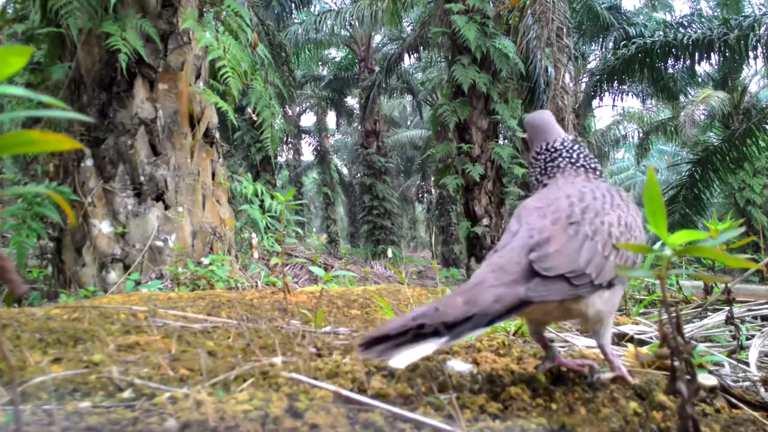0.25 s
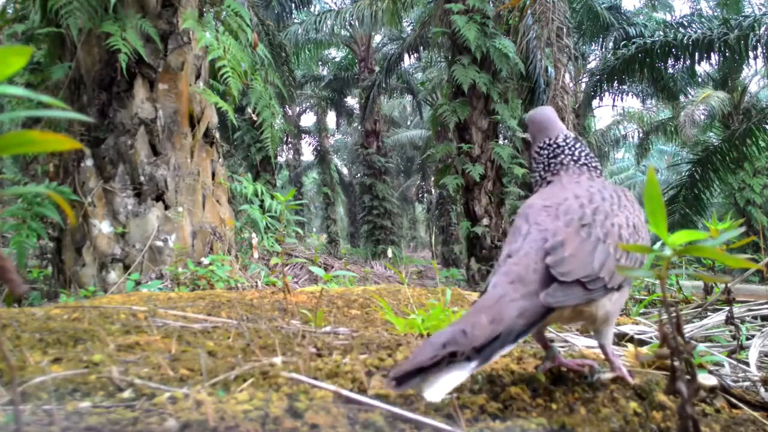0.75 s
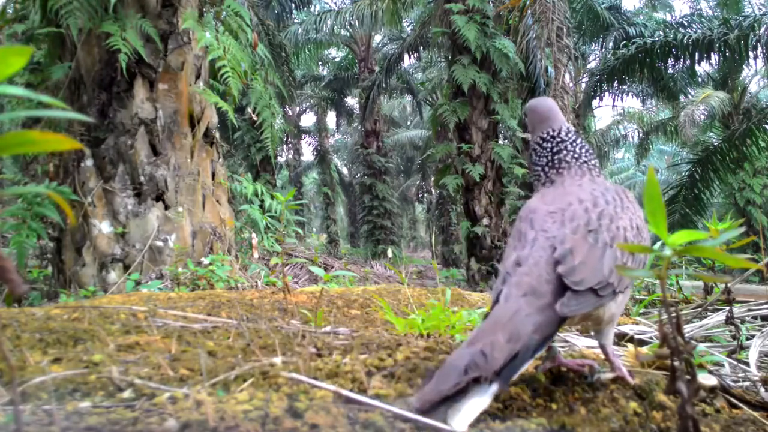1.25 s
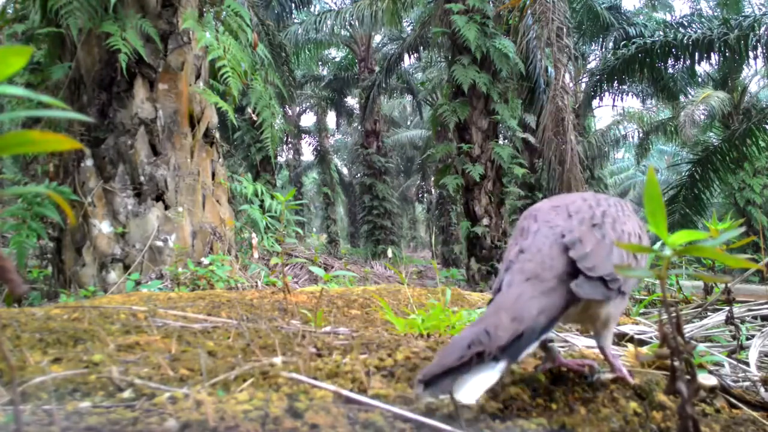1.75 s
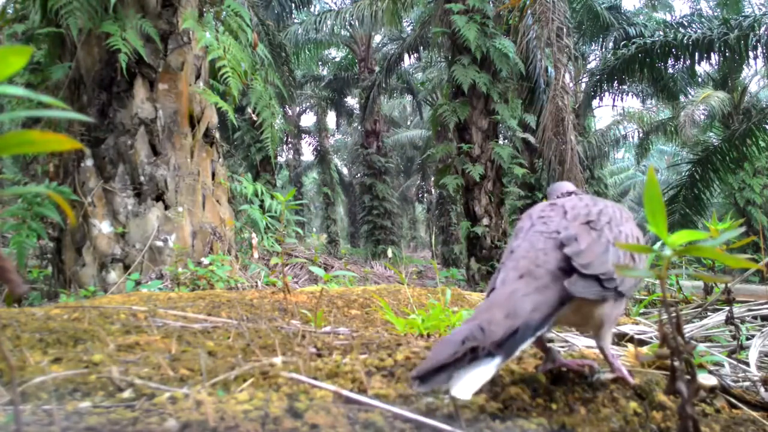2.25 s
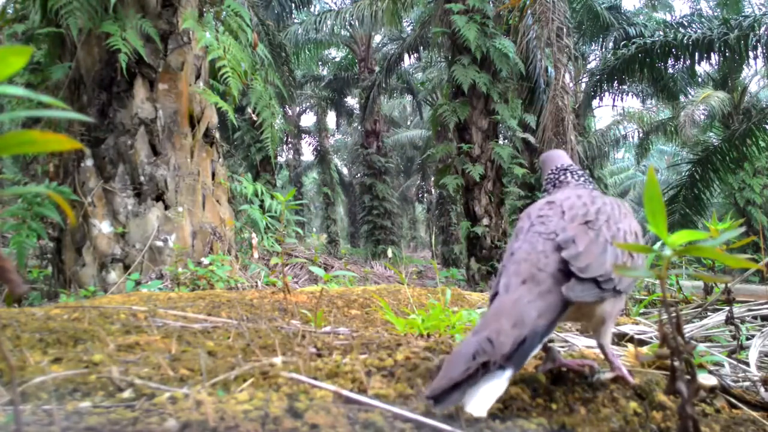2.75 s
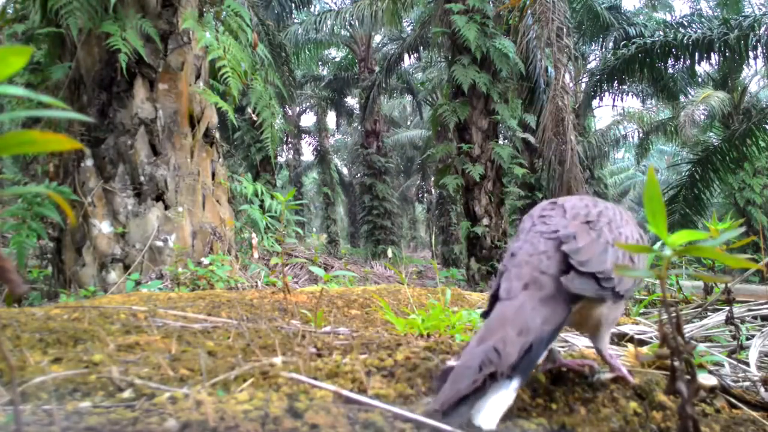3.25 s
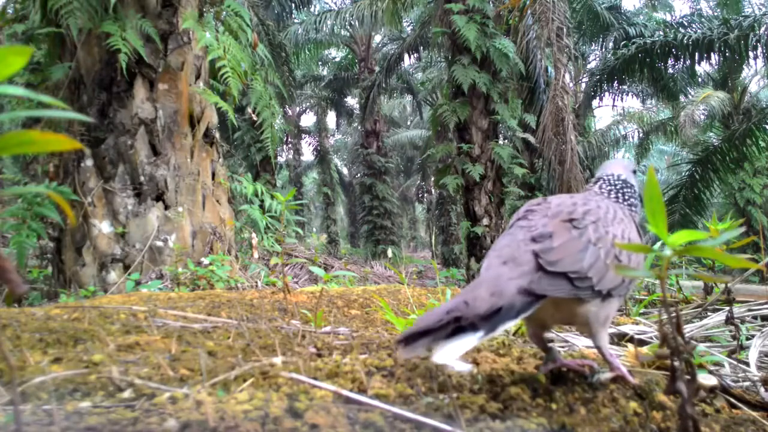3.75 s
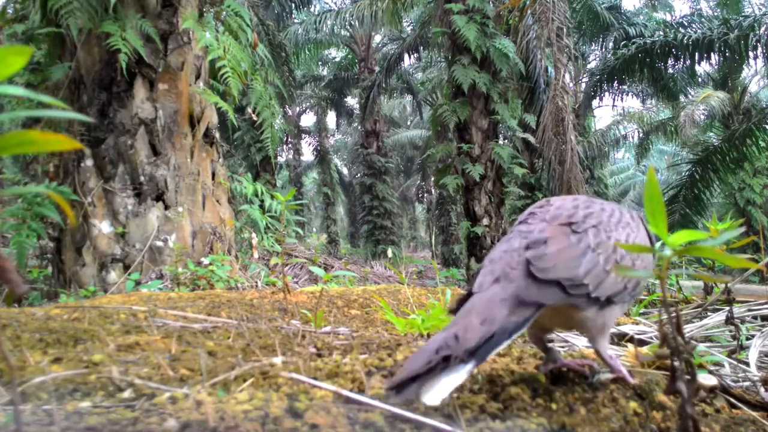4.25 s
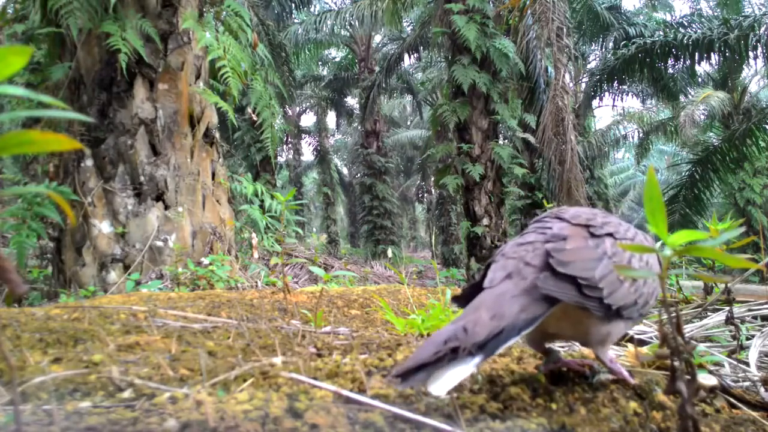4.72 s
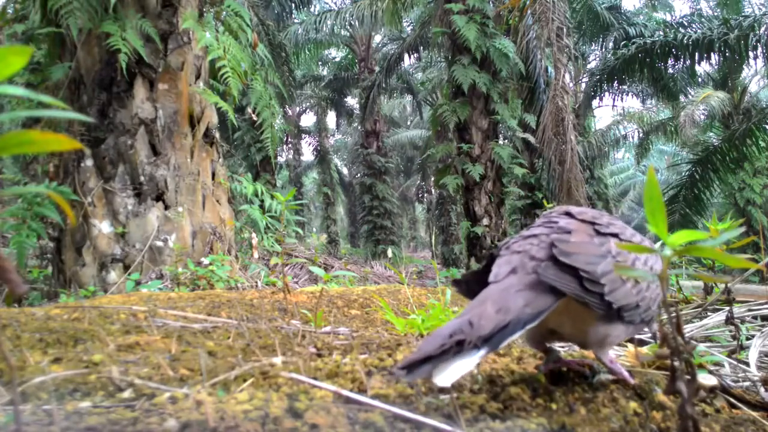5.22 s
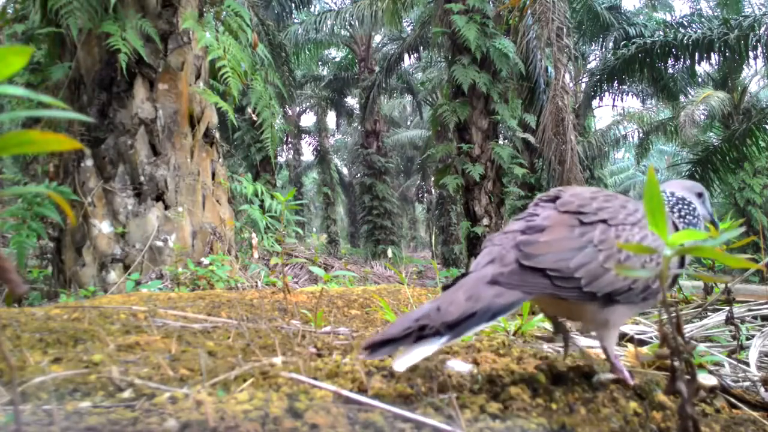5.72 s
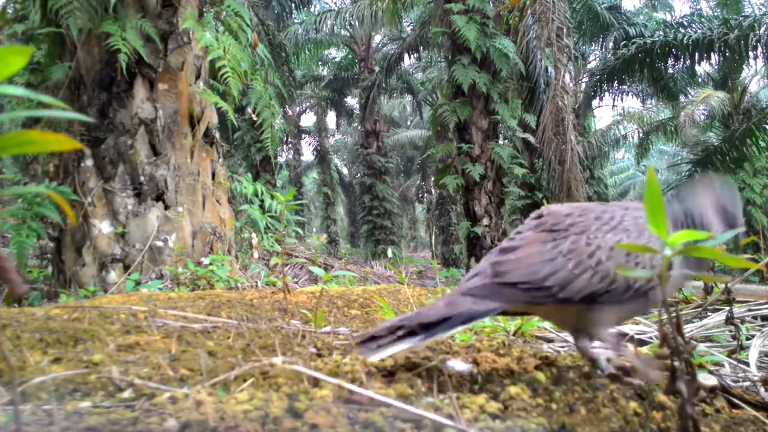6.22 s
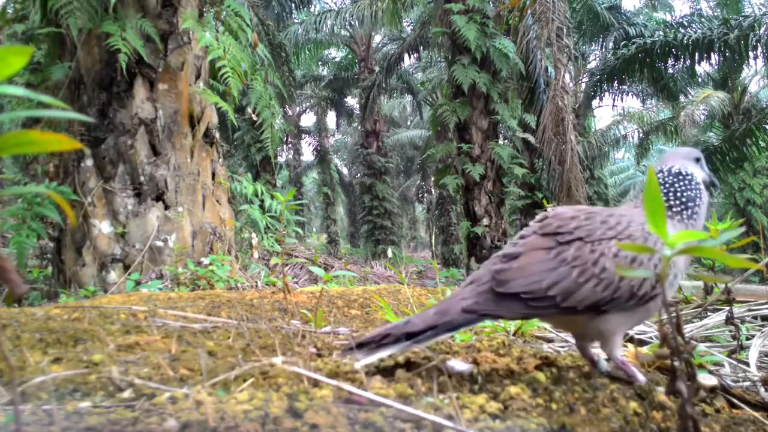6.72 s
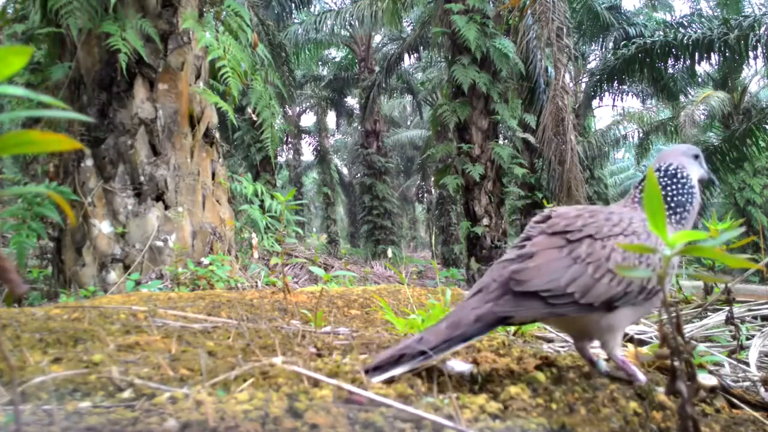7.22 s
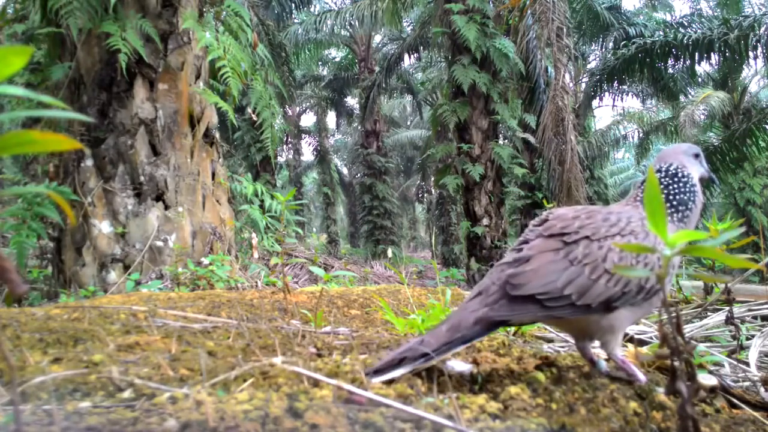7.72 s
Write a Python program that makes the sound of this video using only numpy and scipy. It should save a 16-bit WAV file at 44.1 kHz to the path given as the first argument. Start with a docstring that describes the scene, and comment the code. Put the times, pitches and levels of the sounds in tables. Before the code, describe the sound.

Outdoors among trees, soft doves coo with a fast throaty throb, one of them far off. A sharp double chip from a small bird rings early. After about three seconds a louder dove joins, repeating a short purr followed by a long rising and falling coo. Faint ticks and thin whistles continue, and a hoarse twitter of distant birds swells at the end. Insects and foliage hiss stay very quiet, with slight wind bumps at the microphone.

```python
"""Soft doves coo first in a palm grove, one of them far off; a louder one joins: short purrs, long arched notes.
Each coo is a nearly pure tone that the throat chops into fast throbs. Small birds chip, whistle, call hoarsely
and twitter, their gliding notes and rasps echoing among the trunks. Filtered noise makes the shrill insects,
the foliage, the low hum, a scuff and the wind at the microphone. A noise suppressor sinks quiet stretches."""
import sys
import numpy as np
from scipy import signal
from scipy.fft import rfft, irfft, next_fast_len
from scipy.io import wavfile
from scipy.ndimage import uniform_filter1d

SR = 44100
rng = np.random.default_rng(int(sys.argv[2]) if len(sys.argv) > 2 else 0)


def master_out(mix):
    """Clip the mix to full scale and print it as 16-bit PCM to the path in sys.argv[1]."""
    frames = np.transpose(np.atleast_2d(mix))
    ceiling = np.clip(frames, -1, 1)
    pcm = np.round(ceiling * 32767).astype(np.int16)
    wavfile.write(sys.argv[1], SR, pcm)


N = 351477  # length in samples
TIME = np.arange(N) / SR  # s

# All levels stand ahead of the echo and the recorder's suppressor.
# Distant foliage, spectrum of the hiss. Each row: frequency in Hz, relative density in dB per Hz.
AIR_COLOUR = [(500, -4), (1000, -1), (1700, -0.5), (2800, -0.5), (4000, -1.5), (5500, -0.5), (7000, 0),
              (8000, 1), (8500, -7), (10200, -6), (11000, -64)]
# Low outdoor hum. Each row: frequency in Hz, relative density in dB per Hz.
MURMUR_COLOUR = [(20, -16.5), (50, -1.5), (95, 1.5), (130, -1.5), (250, -4.5), (400, -5.5), (700, -11.5),
                 (1100, -15.5), (2000, -27)]
# Narrow band of the insects. Each row: frequency in Hz, relative density in dB per Hz.
INSECT_COLOUR = [(5000, -41), (5950, -20.5), (6250, -9.5), (6420, -7.5), (6530, -1.5), (6650, -20.5),
                 (6850, -19.5), (8000, -34.5)]
# Soft buffets of wind on the microphone. Each row: start in seconds, length in seconds, level in dB,
# upper edge in Hz.
WIND_BUFFETS = [(.08, 0.27, -67.5, 410), (1.1, 0.1, -79, 110), (1.19, 0.17, -64, 510),
                (1.235, 0.071, -61, 93), (1.49, 0.057, -71, 91), (1.585, 0.076, -53.5, 165),
                (1.67, .07, -57, 140), (1.82, 0.18, -74, 222), (2.33, 0.078, -76, 130),
                (2.48, 0.039, -58, 250), (3.42, 0.089, -64, 130), (4.65, 0.22, -71, 132),
                (6.2, 0.24, -74, 129), (6.89, 0.069, -69, 128)]
# One dry scuff. Each row: frequency in Hz, relative density in dB per Hz.
RUSTLE_COLOUR = [(20, -19), (400, -15), (1000, -14), (3000, -15.5), (5000, -15.5), (6500, -9.5),
                 (8500, -20), (10500, -25.5)]
# Echo among the trunks. Each row: frequency in Hz, time to die by 60 dB in seconds.
GROVE_DECAY = [(500, 0.96), (2000, 0.75), (4000, 0.52), (6500, 0.63), (10000, 0.44)]
# Far birds: low hoarse falling calls and the high twitter of a flock. Each row: start in seconds,
# length in seconds, first pitch in Hz, last pitch in Hz, level in dB before the trims in small_birds().
FAR_BIRDS = [ (6.06, 0.072, 2660, 2454, -67), (6.1, 0.049, 2113, 2010, -73),
             (6.36, 0.088, 2600, 2440, -69.5), (6.41, 0.051, 2070, 2063, -70),
             (6.92, 0.062, 4270, 5660, -62.5), (7.02, 0.062, 5320, 4430, -62.5),
             (7.1, 0.077, 3756, 3550, -64), (7.12, 0.032, 5230, 4650, -61.5),
             (7.18, 0.074, 3450, 3110, -65.5), (7.21, 0.05, 4420, 5070, -58.5),
             (7.23, 0.049, 6060, 6320, -59.5), (7.28, 0.041, 4270, 5290, -53.5),
             (7.275, 0.027, 5370, 5280, -57), (7.35, 0.067, 3120, 2772, -59),
             (7.36, 0.087, 3820, 4760, -60), (7.4, 0.036, 5500, 5160, -53.5),
             (7.44, 0.13, 6290, 5800, -59.5), (7.45, 0.072, 4120, 5240, -53), (7.5, .09, 4980, 4430, -54),
             (7.52, 0.057, 4060, 3940, -56.5), (7.59, 0.067, 4480, 3640, -54),
             (7.65, 0.073, 3010, 2595, -56.5), (7.68, 0.043, 6210, 6850, -61.5),
             (7.72, 0.084, 2880, 2880, -80), (7.75, 0.06, 2286, 2000, -67), (7.81, 0.13, 4820, 4480, -59),
             (7.85, 0.12, 4580, 4560, -56), (7.86, 0.15, 6000, 5500, -64.5), (7.9, 0.047, 4000, 3830, -58),
             ]
# Thin whistled notes of small birds. Each row: start in seconds, length in seconds, first pitch in Hz,
# last pitch in Hz, level in dB before the trims in small_birds().
THIN_WHISTLES = [ (.15, 0.082, 2750, 3760, -74.5), (1.81, 0.15, 2800, 2675, -84),
                 (2.17, 0.045, 2790, 2615, -79), (3.24, 0.059, 2900, 3620, -76),
                 (3.35, 0.045, 2790, 2760, -74), (3.75, 0.046, 2880, 2740, -80),
                 (4.26, 0.072, 2800, 3850, -77), (4.67, 0.067, 2900, 3580, -80),
                 (5.04, 0.064, 2700, 3650, -76.5), (5.34, 0.053, 2790, 2736, -79.5),
                 (5.42, 0.056, 2800, 3370, -84), (6.78, 0.085, 2800, 3930, -83), ]
# One bird's sharp falling tick. Each row: start in seconds, level in dB before the trims in small_birds().
FALLING_TICKS = [(0.189, -66), (1.336, -75), (1.705, -67), (2.095, -88), (3.275, -64), (3.674, -65.5),
                 (4.075, -74), (4.472, -66), (4.849, -69.5), (5.255, -70.5), (5.63, -73.5), (6.014, -68),
                 (6.396, -74)]
# Soft near peeps. Each row: start in seconds, length in seconds, first pitch in Hz, last pitch in Hz,
# level in dB before the trims in small_birds().
NEAR_PEEPS = [(1.594, 0.017, 1870, 1760, -70), (1.688, 0.023, 1880, 1700, -65.5),
              (1.777, .02, 1790, 1710, -72)]
# A near bird's harsh double chip. Each row: start in seconds, length in seconds, level in dB
# before soft clipping.
DOUBLE_CHIP = [(0.651, 0.015, -40), (0.663, 0.024, -33.5)]
# Spectrum of its rasp before soft clipping. Each row: frequency in Hz, relative density in dB per Hz.
CHIP_RASP_COLOUR = [(1800, -50), (2600, -24.5), (3550, -17), (3900, -3.5), (4400, -7.5), (4900, -5),
                    (5300, -4.5), (5700, 2), (6500, 1.5), (7100, -0.5), (7600, -14), (8100, -16),
                    (8500, -41), (10500, -33)]
# Softer doves, one list a coo; the one at 1.29 s is a far dove, the one at 2.43 s an echoing tail.
# Each row: time in seconds, level in dB before the throat, central pitch in Hz,
# throb rate per second before jitter, roughness (no unit, later held to 0.1-1).
SOFT_COOS = [
    [(-.02, -47.5, 708, 53.1, 1), (.09, -46.5, 655, 55.6, 0.46), (.184, -44.5, 619, 56.2, 0.21),
     (.242, -49.5, 595, 54.3, 0.3), (.3, -61.5, 530, 53, 0.24)],
    [(.663, -61.5, 570, 92, 0.32), (.704, -49, 619, 88.3, 0.42), (.812, -48, 609, 94.7, 0.45),
     (.835, -58, 560, 92, 0.52)],
    [(.943, -60, 590, 58.4, 0.17), (.989, -52.5, 629, 58.6, 0.46), (1.021, -56, 641, 58.8, 0.64),
     (1.081, -52.5, 647, 65, 0.58), (1.163, -45, 634, 65.9, 0.52), (1.269, -46, 605, 63.3, 0.35),
     (1.32, -67, 560, 63.6, 0.47)],
    [(1.29, -57.5, 665, 57.4, 1), (1.42, -58.5, 659, 57.1, 0.33), (1.54, -56.5, 630, 59.4, 0.27),
     (1.62, -54.5, 627, 67.4, 0.68), (1.676, -70, 620, 69.4, 0.56), (1.74, -64, 595, 69, 0.25)],
    [(1.77, -67, 570, 87.5, 0.55), (1.813, -50.5, 611, 91, 0.39), (1.925, -48, 600, 88, 0.38),
     (1.96, -67, 545, 92, 0.41)],
    [(2.052, -67, 565, 59.6, 0.23), (2.08, -52.5, 616, 58.7, 0.65), (2.15, -54.5, 635, 58, 0.32),
     (2.205, -44, 643, 60.4, 0.66), (2.305, -46.5, 626, 64, 0.52), (2.429, -50.5, 585, 62, 0.17),
     (2.448, -64.5, 560, 62, 0.4)],
    [(2.43, -62, 640, 69, 0.88), (2.49, -59.5, 620, 67.6, 0.43), (2.55, -81, 600, 69, 0.69)],
    [(2.785, -86, 610, 92, 0.49), (2.85, -69, 620, 91, 0.32), (2.96, -67, 600, 94, 0.61)],
    [(3.08, -53.5, 610, 57.3, 0.5), (3.15, -50.5, 645, 55.4, 1), (3.235, -43, 640, 59.4, 0.25),
     (3.31, -54.5, 625, 58.6, 0.26), (3.42, -67, 580, 60, 0.23)],
    [(3.836, -53, 580, 88, 0.78), (3.858, -46, 605, 87.5, 0.92), (3.92, -52, 608, 89, 0.51),
     (3.984, -46, 600, 89, 0.45), (4.01, -60.5, 560, 88, 0.37)],
    [(4.115, -60, 570, 60.2, 0.17), (4.15, -53.5, 605, 66.4, 0.64), (4.25, -47, 630, 66.1, 0.33),
     (4.36, -54.5, 630, 61.7, 0.36), (4.45, -46, 595, 63.5, 1), (4.485, -66.5, 565, 63.7, 0.31)],
    [(5.13, -60, 570, 56, 0.41), (5.159, -47, 595, 57.2, 0.3), (5.269, -47, 647, 61.3, 0.58),
     (5.361, -46, 615, 71, 0.44), (5.465, -53.5, 590, 76.8, 0.53), (5.505, -66, 560, 72.6, 0.46)],
    [(6.26, -50.5, 660, 59, 0.8), (6.35, -46, 650, 59, 0.39), (6.42, -46.5, 615, 60.6, 0.24),
     (6.48, -47, 600, 60, 0.37), (6.525, -54, 595, 60, 1), (6.548, -65, 560, 60, 0.81)],
    [(6.98, -51.5, 600, 89.3, 1), (7.04, -50, 600, 88, 0.54), (7.1, -51.5, 595, 89.5, 0.35),
     (7.17, -53, 590, 91, 0.6)],
    [(7.53, -46, 670, 55.3, 0.52), (7.65, -42.5, 650, 56.3, 0.6), (7.736, -49, 605, 59.1, 0.63),
     (7.808, -48, 574, 54, 0.1), (7.864, -53, 545, 53, 0.29), (7.91, -47.5, 495, 54, 0.18),
     (7.98, -57.5, 475, 52.4, 0.23)],
]
# The louder dove, one list a coo. Each row: time in seconds, level in dB before the throat,
# central pitch in Hz, throb rate per second before jitter, roughness (no unit, later held to 0.1-1).
LOUD_COOS = [
    [(2.965, -65.5, 490, 92, 0), (2.992, -55.5, 534, 81, 0.4), (3.01, -56.5, 534, 88.2, 0.46),
     (3.08, -51, 520, 85.3, 0.45), (3.135, -45.5, 530, 92, 0.67), (3.172, -58, 480, 91, 0.2)],
    [(3.265, -54.5, 530, 51.4, 1.2), (3.305, -40.5, 589, 52.9, 1.2), (3.4, -40.5, 623, 51.7, 1.3),
     (3.5, -36.5, 614, 46, 0.99), (3.6, -34.5, 596, 45.4, 0.6), (3.74, -40.5, 541, 51, 0.42),
     (3.82, -49, 480, 48, 0.26), (3.84, -67, 450, 44.8, 0.3)],
    [(4.25, -53.5, 540, 85.3, 1.1), (4.29, -40.5, 575, 89, 0.5), (4.35, -44.5, 570, 91.8, 0.84),
     (4.38, -41, 570, 88, 0.5), (4.435, -49, 490, 103.5, 0.76), (4.46, -54, 430, 88, 0.6)],
    [(4.56, -57, 510, 62.4, 1), (4.605, -43.5, 585, 60.6, 1.23), (4.69, -38, 630, 65.8, 0.64),
     (4.77, -38, 625, 65, 1.04), (4.84, -34.5, 607, 66.6, 0.24), (4.935, -35.5, 587, 65.5, 0.65),
     (5.06, -43.5, 526, 62, 0.29), (5.1, -50, 485, 60.6, 0.3), (5.128, -63.5, 455, 61.56, 0.1)],
    [(5.532, -64.5, 530, 95.04, 0.14), (5.553, -48, 552, 76.2, 0.74), (5.64, -46.5, 550, 88.8, 0.72),
     (5.683, -43, 554, 92, 0.7), (5.713, -46, 520, 104, 1), (5.735, -67, 450, 89.81, 0.6)],
    [(5.822, -58.5, 470, 63.5, 0.5), (5.884, -42.5, 590, 67.64, 1.2), (5.966, -38, 614, 65.1, 0.55),
     (6.084, -34, 615, 66.1, 0.6), (6.15, -35.5, 594, 65.3, 0.66), (6.236, -36.5, 578, 65, 0.27),
     (6.33, -43.5, 530, 59.6, 0.48), (6.385, -50.5, 475, 68.4, 0.48), (6.415, -62, 440, 69.12, 0.4)],
    [(6.834, -55, 525, 79.63, 0.4), (6.852, -46, 544, 80, 0.7), (6.92, -43.5, 550, 91.6, 0.68),
     (6.996, -43, 547, 90.3, 0.6), (7.03, -54, 480, 101, 0.8)],
    [(7.13, -53, 500, 48.6, 0.8), (7.17, -42, 546, 54.4, 0.92), (7.22, -38.5, 604, 48.7, 0.92),
     (7.32, -35.5, 605, 46.5, 0.99), (7.44, -31.5, 597, 61.7, 0.27), (7.53, -36, 560, 56.5, 0.36),
     (7.61, -42, 510, 57.5, 0.24), (7.64, -52, 475, 57.3, 0.4), (7.658, -60.5, 420, 61, 0.7)],
]
# Throat resonance of the softer doves. Each row: frequency in Hz, gain in dB.
SOFT_THROAT_GAIN = [(400, -27), (500, -13.5), (545, 1.5), (590, 0.5), (700, -1), (780, -1.5), (860, -7.5),
                    (1300, 4.5)]
# Throat resonance of the louder dove. Each row: frequency in Hz, gain in dB.
LOUD_THROAT_GAIN = [(250, -23.5), (380, 0), (470, 5), (620, -0.5), (760, 5.5), (820, 5), (900, 3.5),
                    (1300, -5.5)]


def gain_of(db):
    """Turns dB into an amplitude factor."""
    return 10 ** (np.asarray(db) / 20)


def evened(x):
    """Scales to rms 1."""
    return x / np.sqrt(np.mean(x ** 2) + 1e-20)


def read(points, hz):
    """Reads a spectrum on a log-frequency axis."""
    f, value = np.transpose(points)
    return np.interp(np.log(hz + 1), np.log(f + 1), value)


def add(mix, s, sound):
    """Mixes a sound in at time s, dropping what falls outside the mix."""
    start = round(s * SR)
    sound = sound[max(-start, 0):]
    part = mix[max(start, 0):][:len(sound)]
    part += sound[:len(part)]


def coloured(x, colour):
    """Filters x by a spectrum."""
    size = next_fast_len(N + 4096)
    gain = gain_of(read(colour, np.fft.rfftfreq(size, 1 / SR)))
    return irfft(rfft(x, size) * gain, size)[:N]


def noise(colour):
    """Noise of rms 1 with the given spectrum."""
    return evened(coloured(rng.standard_normal(N), colour))


def lowpassed(x, edge_hz):
    """Third-order low-pass."""
    return signal.sosfilt(signal.butter(3, edge_hz, fs=SR, output="sos"), x)


def drift(t, per_s):
    """A random wander along t that takes a new course per_s times a second."""
    knots = rng.standard_normal(2048)
    return np.interp((t - t[0]) * per_s, np.arange(len(knots)), knots)


def burst(s, length, taper):
    """A tapered gate over the whole time line."""
    gate = np.zeros(N)
    add(gate, s, signal.windows.tukey(max(round(length * SR), 8), min(taper, 1)))
    return gate


def grove(x, delay=0.0041):
    """Trunks and fronds scatter a sound: sparse echoes, each band dying at its own speed."""
    echo_chance = 2500 / SR  # 2500 echoes a second on average
    taps = rng.standard_normal(SR) * (rng.random(SR) < echo_chance)
    taps *= np.arange(SR) > delay * SR  # no echo before the delay in seconds
    hz, t, z = signal.stft(taps, SR, nperseg=256)
    decay = gain_of(-60 * t / read(GROVE_DECAY, hz)[:, None])
    tail = signal.istft(z * decay, SR, nperseg=256)[1]
    return signal.fftconvolve(x, tail / np.linalg.norm(tail))[:N]


def background(air_db=-70.5, murmur_db=-69, insects_db=-65.5, flutter_db=1.0, insect_swell_db=1.0):
    """Steady foliage hiss and low hum under the insects' narrow, wavering shrill."""
    swell = insect_swell_db * drift(TIME, 5.2)
    flutter = flutter_db * drift(TIME, 70)
    insects = gain_of(insects_db + swell + flutter) * noise(INSECT_COLOUR)
    return gain_of(air_db) * noise(AIR_COLOUR) + gain_of(murmur_db) * noise(MURMUR_COLOUR) + insects


def wind():
    """Dull buffets at the microphone: swells of low-passed noise."""
    out = np.zeros(N)
    for s, length, db, edge_hz in WIND_BUFFETS:
        # the end of a longer noise, where the filter has settled
        puff = lowpassed(rng.standard_normal(SR // 2), edge_hz)[-round(length * SR):]
        add(out, s, gain_of(db) * evened(puff * signal.windows.hann(len(puff))))
    return out


def rustle(level_db=-54):
    """One brief, dry scuff: a short gate of coloured noise."""
    return gain_of(level_db) * noise(RUSTLE_COLOUR) * burst(2.491, 0.035, 0.07)


def notes(table, waver, waver_per_s):
    """Gliding notes that swell and fade; a fast waver of pitch makes them hoarse."""
    out = np.zeros(N)
    for s, length, first_hz, last_hz, db in table:
        t = np.arange(0, length, 1 / SR)
        hz = np.linspace(first_hz, last_hz, len(t)) * (1 + waver * drift(t, waver_per_s))
        tone = np.sin(2 * np.pi * np.cumsum(hz) / SR)
        add(out, s, gain_of(db) * evened(tone * signal.windows.tukey(len(t), .85)))
    return out


def small_birds():
    """Near peeps, a repeated tick, thin whistles, and far calls and twitter that arrive mostly as echo."""
    peeps = notes(NEAR_PEEPS, waver=0.012, waver_per_s=340)
    # each tick lasts 0.037 s and falls from 6870 to 3105 Hz
    tick_rows = [(s, 0.037, 6870, 3105, db) for s, db in FALLING_TICKS]
    ticks = notes(tick_rows, waver=0.042, waver_per_s=1100)
    whistles = notes(THIN_WHISTLES, waver=0.025, waver_per_s=530)
    far_birds = notes(FAR_BIRDS, waver=0.0521, waver_per_s=800)
    # the harshest part of each note spreads far around its pitch
    far_birds += gain_of(-3.5) * notes(FAR_BIRDS, waver=0.147, waver_per_s=1200)
    direct = gain_of(3.0) * peeps + gain_of(-4) * ticks
    direct += gain_of(0.5) * whistles + gain_of(-6.5) * far_birds
    to_grove = gain_of(-6) * peeps + gain_of(-1.5) * ticks
    to_grove += gain_of(2) * whistles + gain_of(-1) * far_birds
    return direct + grove(to_grove)


def chip(echo_db=0.0):
    """A near bird's double chip, softly clipped noise of jumping level, rings on among the trunks."""
    gate = sum(gain_of(db) * burst(s, length, 0.46) for s, length, db in DOUBLE_CHIP)
    rasp = evened(noise(CHIP_RASP_COLOUR) * gain_of(2 * drift(TIME, 900)))
    call = gate * 1.8 * np.tanh(rasp / 1.8)
    return call + gain_of(echo_db) * grove(call)


def coo(rows, jitter, slip, bend, rebound, uneven_db, sharpness=2.58, overtone_db=-52,
        rasp_db=-33, rasp_width_hz=330, rounding_hz=185):
    """A pure tone chopped into uneven throbs that restart out of step; rough ones are narrow and rebound once."""
    s, *columns = np.transpose(rows)
    t = np.arange(s[0], s[-1], 1 / SR)
    level_db, hz, rate, rough = (np.interp(t, s, c) for c in columns)
    rough = np.clip(rough, .1, 1)
    chance = rng.uniform(-1, 1, (128, 5)) * np.sqrt(3)  # one row a throb, each column of rms 1

    # each throb lasts its own while; the fast purr of a short note is more even
    lengths = 1 + jitter * min(60 / rate.mean(), 1) ** 2 * chance[:, 4]
    throbs = np.interp(np.cumsum(rate) / SR, np.cumsum(lengths) - lengths[0], np.arange(len(lengths)))
    size, step, back_size, back_step, _ = chance[throbs.astype(int)].T
    opening = np.sin(np.pi * throbs) ** 2
    depth = np.clip(2.8 * rough, 0, 1)
    shape = opening ** (.2 + sharpness * rough ** 3)

    # pressure lifts the pitch at the crest of each throb, so sidebands lie mostly above the tone
    phase = slip * np.sqrt(rough) * step - bend * np.sin(2 * np.pi * throbs)
    hz = hz - 0.259 * bend * rate  # lowered to offset that lift
    main = shape * gain_of(uneven_db * size) * np.exp(1j * phase)
    after = rebound * np.sqrt(rough) * (1 - opening) ** 2
    after = after * (1 + .5 * back_size) * np.exp(2j * back_step)

    # the inflated throat rounds off every throb
    rounding = signal.butter(3, rounding_hz, fs=SR, output="sos")
    throb = signal.sosfiltfilt(rounding, 1 - depth + depth * (main + after))
    throb /= np.sqrt(uniform_filter1d(abs(throb) ** 2, size=2200) + 1e-9)  # even level over 50 ms

    # turbulence spreads a faint skirt around the tone
    rasp = lowpassed(rng.standard_normal((2, len(t))), rasp_width_hz)
    throb *= 1 + gain_of(rasp_db) * rough * (evened(rasp[0]) + 1j * evened(rasp[1]))
    tone = throb * np.exp(2j * np.pi * np.cumsum(hz) / SR)
    voice = np.sqrt(2) * (tone + gain_of(overtone_db) * tone ** 2).real
    fade = np.clip(np.minimum(t - t[0], t[-1] - t) / 0.0034, 0, 1)  # 3.4 ms at each end
    return s[0], voice * gain_of(level_db) * fade


def doves(loud_echo_db=-21, soft_echo_db=-18):
    """The loud dove and the softer ones through their throat resonances, with the grove's faint answer."""
    loud, soft = np.zeros(N), np.zeros(N)
    for rows in LOUD_COOS:
        add(loud, *coo(rows, jitter=.24, slip=1.25, bend=.4, rebound=.48, uneven_db=1.8))
    for rows in SOFT_COOS:
        add(soft, *coo(rows, jitter=.2, slip=.8, bend=.7, rebound=.45, uneven_db=1.6))
    loud, soft = coloured(loud, LOUD_THROAT_GAIN), coloured(soft, SOFT_THROAT_GAIN)
    return loud + soft + grove(gain_of(loud_echo_db) * loud + gain_of(soft_echo_db) * soft)


def scene():
    """Everything in the grove, heard at one point."""
    return (background() + wind() + rustle() + small_birds() + chip() + doves())[None]


def suppressor(x, threshold_db=-50, slope=0.87, glide_db_per_s=55, shrill_extra=0.36):
    """Turns quiet stretches down, gliding shut after a sound and open ahead of the next."""
    level_db = 10 * np.log10(abs(uniform_filter1d(x ** 2, size=1300)) + 1e-12)
    wanted_db = slope * np.minimum(level_db - threshold_db, 0)
    ramp = glide_db_per_s * TIME
    closing = np.maximum.accumulate(wanted_db + ramp) - ramp
    opening = np.maximum.accumulate((wanted_db - ramp)[::-1])[::-1] + ramp
    cut_db = np.maximum(closing, opening)  # negative where it turns down
    # it bites hardest on the insects' band
    band = signal.butter(2, (5900, 7000), "bandpass", fs=SR, output="sos")
    shrill = signal.sosfiltfilt(band, x)
    return gain_of(cut_db) * (x - shrill + gain_of(shrill_extra * cut_db) * shrill)


def record(dry):
    """The recorder's noise suppressor, then its upper band limit at 10.8 kHz."""
    band_limit = signal.firwin(401, 10800, window=("kaiser", 9), fs=SR)
    return signal.oaconvolve(suppressor(dry[0]), band_limit, "same")[None]


dry = scene()
out = record(dry)
master_out(out)
```